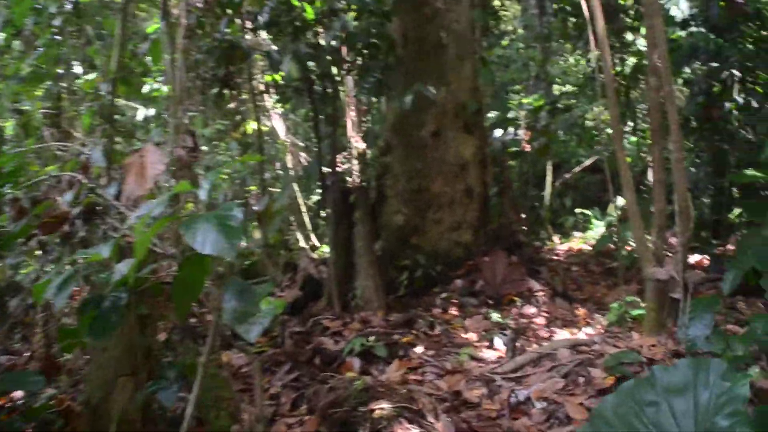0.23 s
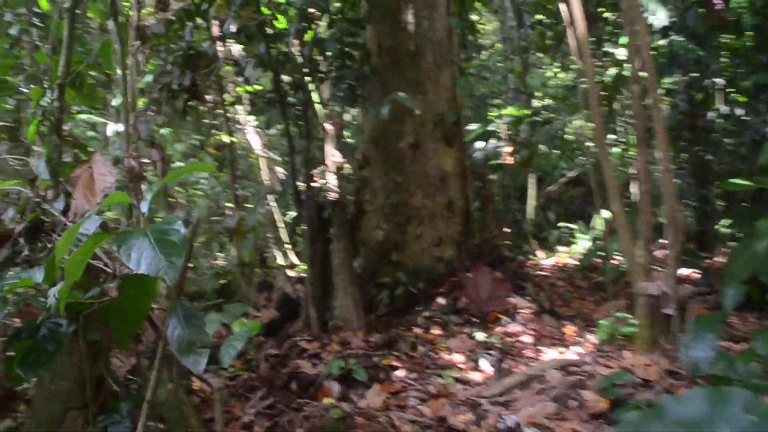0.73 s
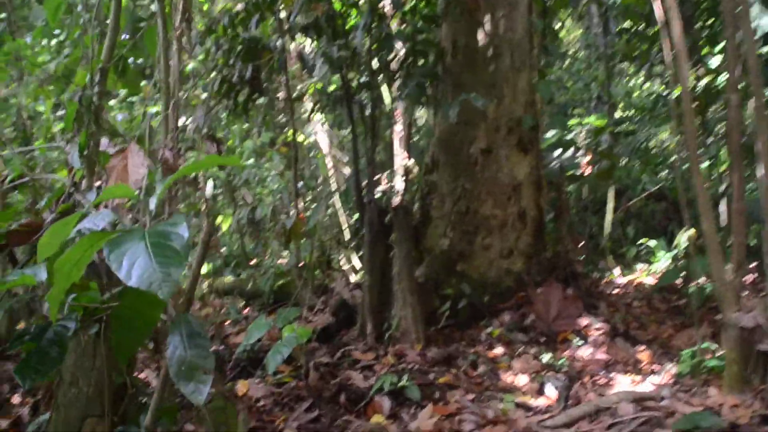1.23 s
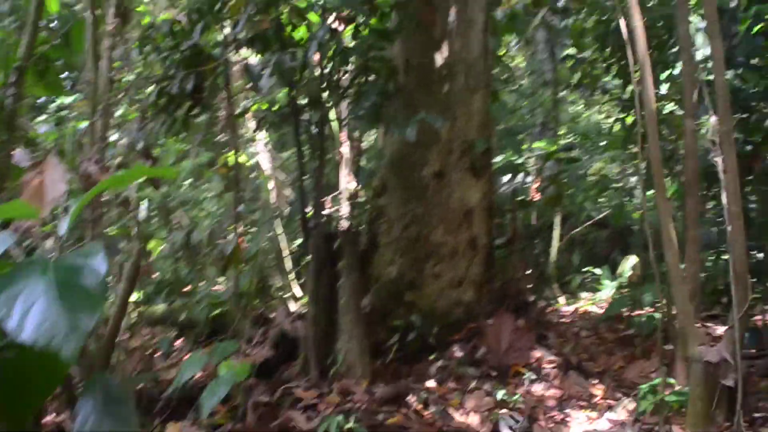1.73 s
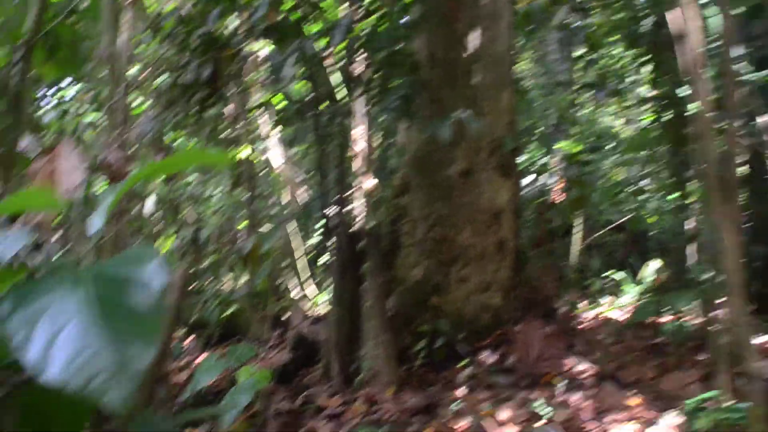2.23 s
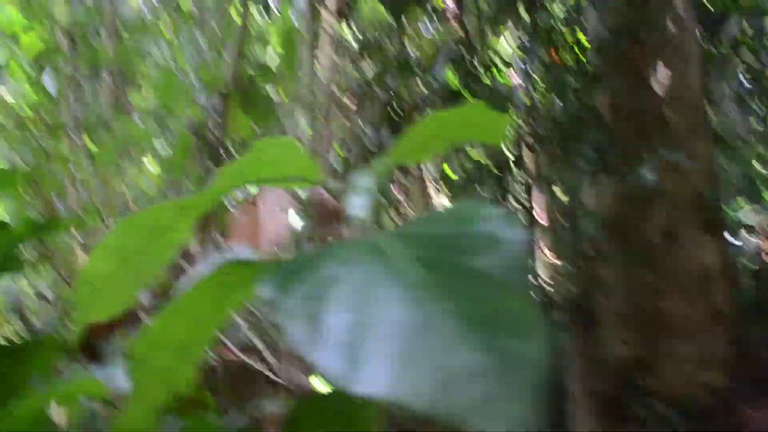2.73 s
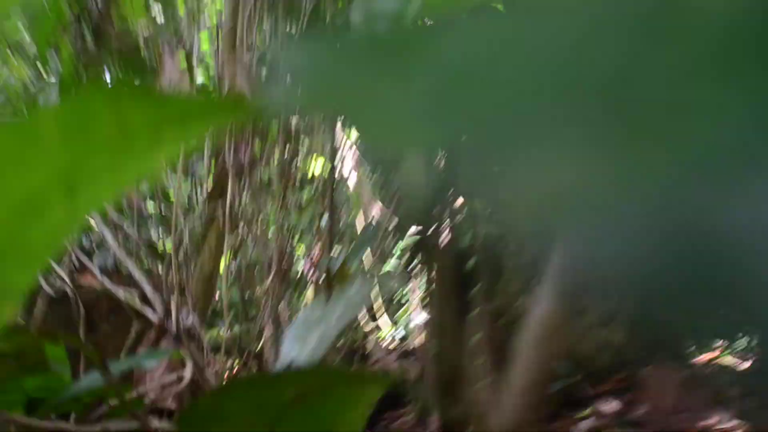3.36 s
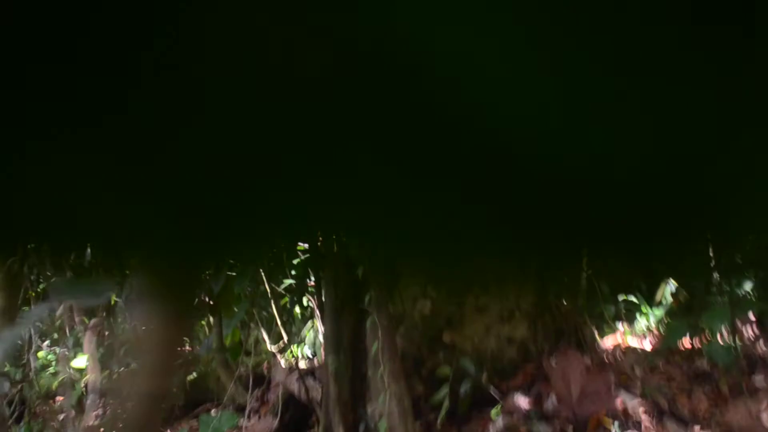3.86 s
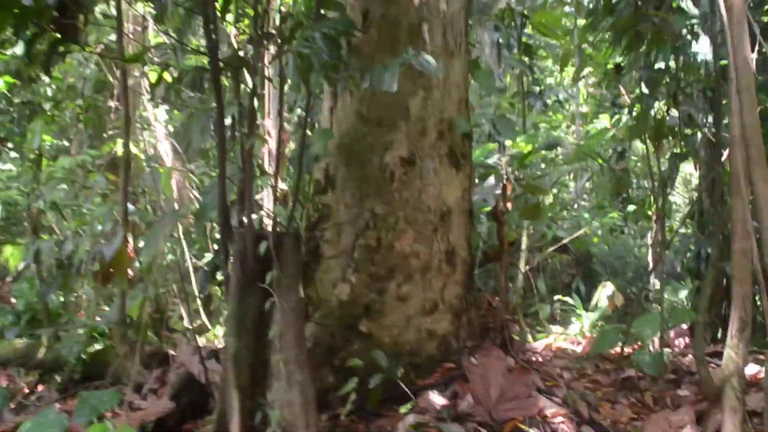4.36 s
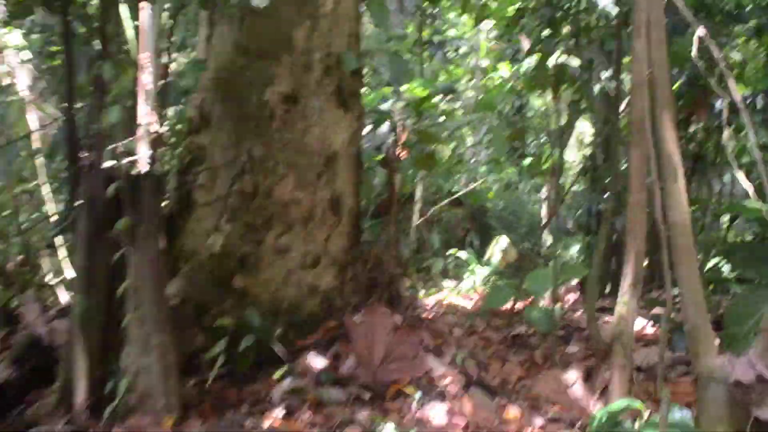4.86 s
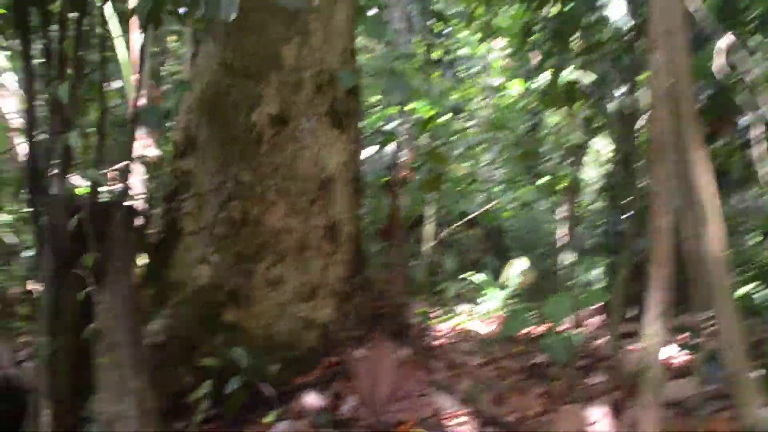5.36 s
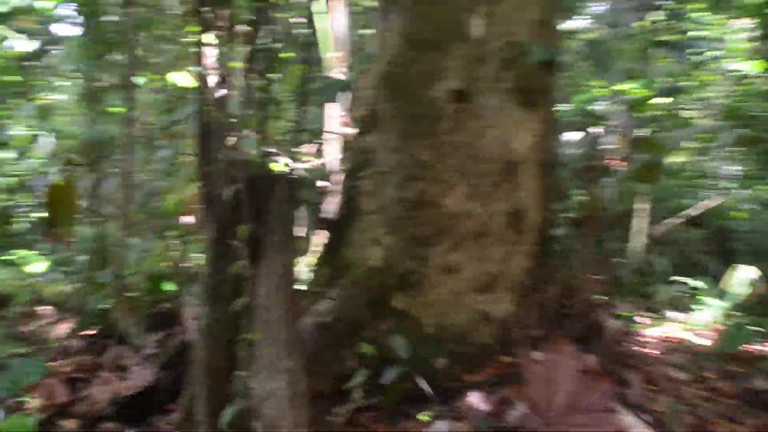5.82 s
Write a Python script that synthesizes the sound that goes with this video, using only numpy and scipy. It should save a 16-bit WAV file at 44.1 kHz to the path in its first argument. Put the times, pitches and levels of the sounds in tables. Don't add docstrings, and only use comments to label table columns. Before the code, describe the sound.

Quiet rainforest hiss with a distant hoot, then leaves and twigs knock the microphone as a shrill cicada buzz bursts in and quickens.

```python
import sys
import numpy as np
from scipy import signal
from scipy.fft import rfft, irfft, next_fast_len
from scipy.io import wavfile
from scipy.ndimage import map_coordinates

SR = 44100
rng = np.random.default_rng(int(sys.argv[2]) if len(sys.argv) > 2 else 0)


def materialize(psi):
    bounded = np.clip(np.atleast_2d(psi).T, -1, 1)
    quanta = np.round(bounded * 32767).astype(np.int16)
    wavfile.write(sys.argv[1], SR, quanta)


def makeup_ratio(level_db):
    decades = np.asarray(level_db, float) / 20
    return 10 ** decades


N = 268569


def rms_one(x):
    return x / np.sqrt(np.mean(x ** 2) + 1e-20)


def in_time(rows):
    s, *columns = np.transpose(rows)
    return [np.interp(np.arange(N) / SR, s, c) for c in columns]


def coloured(x, spectrum):
    size = next_fast_len(N)
    hz, db = np.transpose(spectrum)
    log_hz = np.log(np.maximum(np.arange(size // 2 + 1) * SR / size, 1))
    gain = makeup_ratio(np.interp(log_hz, np.log(hz), db, left=-90, right=-90))
    return rms_one(irfft(rfft(x, size) * gain, size)[:N])


def drift(rate_hz):
    r = np.exp(-2 * np.pi * rate_hz / SR)
    slow = signal.lfilter([1], [1, -2 * r, r * r], rng.standard_normal(N + SR))
    return rms_one(slow[SR:])


def resonance(x, hz, width_hz):
    r = np.exp(-np.pi * width_hz / SR)
    return signal.lfilter([(1 - r * r) / 2, 0, (r * r - 1) / 2], [1, -2 * r * np.cos(2 * np.pi * hz / SR), r * r], x)


def delayed(x, lag_ms):
    return map_coordinates(x, [np.arange(N) - lag_ms / 1000 * SR], order=3)


def band(x, low_hz, high_hz):
    return signal.sosfilt(signal.butter(2, [low_hz, high_hz], "band", fs=SR, output="sos"), x)


def grains(per_s, spread_db):
    sizes = makeup_ratio(spread_db * np.minimum(rng.exponential(1, N), 4)) * rng.choice([-1, 1], N)
    return sizes * (rng.random(N) < per_s / SR) + 0.17 * rng.standard_normal(N)


def swells(at_s, rise_s, fade_s, db, edge_db=20.0):
    t, out = np.arange(N) / SR, np.zeros(N)
    for s, rise, fade, peak_db in np.broadcast(at_s, rise_s, fade_s, db):
        near = slice(max(int((s - 4 * rise) * SR), 0), int((s + 4 * fade) * SR))
        distance = np.maximum((s - t[near]) / rise, (t[near] - s) / fade)
        out[near] += makeup_ratio(peak_db - edge_db * distance)
    return out


# t/s, level/dB, share of the two low modes/dB
CICADA_LEVEL = [(3.25, -34.5, 1), (3.33, -27, -10), (3.61, -18.5, -10), (3.89, -20, -4), (4.02, -20.5, -10),
                (4.06, -15, -9.5), (5.08, -15, -6), (5.52, -14.5, -4.5), (6.07, -16, -8.5)]
# t/s, clicks per s, lag of the inverted echo off the bark/ms
TYMBAL_RHYTHM = [(3.2, 284, 1.50), (3.55, 306, 1.356), (3.9, 305, 1.32), (4.3, 306, 1.316),
                 (4.6, 314, 1.316), (5.05, 331, 1.324), (5.5, 371, 1.352), (5.75, 394, 1.40),
                 (5.9, 410, 1.49), (6.09, 430, 1.515)]
# f/Hz, width/Hz, level/dB
ABDOMEN_MODES = [(2830, 550, -62), (3515, 574, 1.5), (4212, 923, 8.5), (4750, 680, -7), (5640, 1300, -14)]
# f/Hz, level per Hz/dB
SNAP_COLOUR = [(5000, -43), (5600, -4.5), (6500, -3.5), (7300, -4), (8200, -11.5), (10000, -14.5),
               (11500, -24.5), (13000, -34), (14500, -32), (15600, -59)]
# lag/ms, level/dB
TRUNK_ECHOES = [(4.7, -14.5), (7.9, -13.5), (13.3, -17.5), (21.7, -10.5), (34.1, -11)]


def cicada(strength_db=1.0, weak_db=0.0, rattle_ms=27.0, bark_hz=3600, bark_ms=0.02):
    rate, lag_ms = in_time(TYMBAL_RHYTHM)
    level_db, low_db = in_time(CICADA_LEVEL)
    faster = rate - 305
    uneven = np.clip(0.025 + 0.002 * (rate - 370), 0.025, 0.11)
    jitter_ms = 0.09 - 0.0003 * faster
    echo = 0.5 * np.exp(-np.maximum(lag_ms - 1.32, 0) / 0.1)

    beat = np.cumsum(rate) / SR
    k = np.arange(1, int(beat[-1]))
    at = np.interp(k, beat, np.arange(N)).astype(int)
    odd = k % 2
    time_luck, strength_luck = rng.standard_normal((2, len(k)))
    late_s = -odd * uneven[at] * 2 / rate[at] + jitter_ms[at] / 1000 * time_luck
    clicks = np.full(N, 1e-18)
    clicks[np.clip(at + late_s * SR, 0, N - 1).astype(int)] = makeup_ratio(strength_db * strength_luck + weak_db * odd)
    scatter = makeup_ratio(-10.5) * rng.standard_normal(N)
    drive = rms_one(clicks) + scatter

    top_db = 1.9 * (-3 + 0.08 * faster)
    ring = np.zeros(N)
    for hz, width_hz, db in ABDOMEN_MODES:
        mode_db = db + (hz < 3800) * (low_db + 7.0) + (hz > 4450) * top_db
        ring += makeup_ratio(mode_db) * resonance(resonance(drive, hz, width_hz), hz, width_hz)
    ring = rms_one(signal.sosfilt(signal.butter(8, 2650, "high", fs=SR, output="sos"), ring))

    r = np.exp(-1000 / (rattle_ms * SR))
    rattle = rms_one(signal.lfilter([1], [1, -r], clicks)) * rng.standard_normal(N)
    snap_db = -10.5 - 0.0747 * faster - 0.5
    snap = makeup_ratio(snap_db) * coloured(rattle + scatter, SNAP_COLOUR)

    low_return = delayed(0.32 * ring + 0.23 * resonance(ring, bark_hz, 880), lag_ms + bark_ms)
    song = ring - echo * low_return + snap - 0.68 * delayed(snap, lag_ms)
    song = song + sum(makeup_ratio(db) * delayed(song, ms + 0.05 * drift(0.7)) for ms, db in TRUNK_ECHOES)
    started = np.arange(N) > CICADA_LEVEL[0][0] * SR
    return makeup_ratio(level_db + 0.46) * song * started


# middle t/s, length/s, housing level/dB, brightness/dB
LEAF_SWEEPS = [(2.498, .3, -34, -4), (2.685, 0.26, -35.5, 5.5), (3.02, 0.99, -43, 4),
               (3.302, .36, -29.5, 4), (3.81, .6, -35, 7.5), (3.933, 0.15, -36, 8.5), (4.447, 1, -45, 8),
               (4.795, 0.51, -38.5, -5), (5.282, 0.46, -42, 6)]
# t/s, fade/s, housing level/dB, brightness/dB
LEAF_SCUFFS = [(2.731, 0.069, -26, 5), (2.89, .04, -32.5, -6), (3.238, 0.013, -25.5, -1),
               (3.976, 0.026, -24.5, 11), (4.009, 0.071, -18, -2), (4.032, 0.01, -21, 13),
               (4.088, 0.048, -30, -7), (4.122, 0.016, -28, 1), (4.964, 0.081, -57, 20),
               (5.132, 0.024, -34, -5), (5.182, 0.05, -36, -5), (5.345, 0.035, -32, 0),
               (5.499, 0.055, -36.5, 7)]
# t/s, fade/s, level/dB
DRY_EDGES = [(2.446, 0.047, -49), (2.514, 0.05, -39.5), (2.69, .03, -49), (2.705, 0.045, -22.5),
             (2.74, 0.13, -33), (2.82, 0.037, -44), (3.037, 0.019, -34), (3.2, 0.12, -39),
             (3.236, 0.026, -23.5), (3.26, .11, -48)]


def brushing(scuff_rise_s=0.005):
    s, length, db, bright_db = np.transpose([*LEAF_SWEEPS, *LEAF_SCUFFS])
    slow = np.arange(len(s)) < len(LEAF_SWEEPS)
    rise = np.where(slow, length / 2, scuff_rise_s)
    fade = np.where(slow, length / 2, length)
    scrape = grains(2500.0, spread_db=2.5) * makeup_ratio(2.5 * drift(30.0))
    low = rms_one(band(scrape, 312, 1170)) * swells(s, rise, fade, db - 1.0)
    mid = rms_one(band(scrape, 700, 4000)) * swells(s, rise, fade, db + bright_db - 2.5)
    edge_s, edge_fade, edge_db = np.transpose(DRY_EDGES)
    hiss = rms_one(band(band(scrape, 1200, 9000), 860, 9200))
    return low + mid + hiss * swells(edge_s, scuff_rise_s, edge_fade, edge_db + 1.0)


# t/s, peak level/dB, ring f/Hz, crack level/dB
HOUSING_BUMPS = [(2.449, -27.5, 626, -27), (2.485, -24, 600, -31), (2.519, -24.5, 460, -29),
                 (2.884, -27, 600, -35), (3.184, -27, 620, -32), (3.239, -29, 610, -20),
                 (3.274, -29, 1090, -14), (3.324, -29, 754, -25), (3.961, -24, 626, -20),
                 (4.095, -28, 662, -9), (5.498, -28, 523, -11), (5.889, -24, 1030, -9)]
# t/s, peak level/dB, ring f/Hz, crack level/dB
TWIG_RAPS = [(2.425, -23, 2300, -24), (2.704, -21, 2130, -20), (2.731, -2, 2080, -34),
             (2.769, -26, 1650, -24), (2.818, -30, 2220, -13), (3.129, -31, 1350, -16),
             (3.232, -14, 2070, -18), (3.396, -20, 1630, -15), (3.828, -27, 2370, -8),
             (4.521, -21.5, 2310, -17), (4.748, -21.5, 2240, -15)]
# t/s, peak level/dB, ring f/Hz, crack level/dB
STEM_TICKS = [(2.5162, -21.5, 2650, -30), (3.033, -23, 4030, -36), (3.0973, -16, 3160, -36),
              (3.9739, -8, 2520, -21), (3.9744, -15, 4270, -36), (4.0073, -12, 2670, -30),
              (4.0147, -5.5, 1890, -28), (4.0196, -3.5, 2640, -32), (4.0296, 10.5, 3450, -37),
              (4.029, -8, 2180, -28), (4.121, -5.5, 1830, -17), (5.3471, -3.5, 1760, -15.5),
              (5.3467, -11, 2800, -30), (5.9734, -3.5, 2100, -30)]
# t/s, peak level/dB, ring f/Hz, crack level/dB
CAPSULE_JOLTS = [
    (3.974, -16, 625, -14),
    (4.008, -9, 654, -15),
    (4.018, -13.5, 1020, -9),
    (4.0297, -7.5, 810, -9),
    (4.086, -20, 503, -22),
]
# time to fade 60 dB/s, thud level/dB, jolt level/dB
KINDS_OF_BLOW = [
    (0.034, -5, -19),
    (0.039, -8, -23),
    (0.02, -32, -41),
    (0.024, -2.5, 0.5),
]


def knocks():
    out, t = np.zeros(N + SR), np.arange(SR // 5) / SR
    groups = [HOUSING_BUMPS, TWIG_RAPS, STEM_TICKS, CAPSULE_JOLTS]
    blows = np.array([[*row, *kind] for rows, kind in zip(groups, KINDS_OF_BLOW) for row in rows])
    white = rng.standard_normal((len(blows), len(t)))
    white[:, 0] += 0.64 * np.clip(blows[:, 1] + 31.0, 0, None)
    for (s, db, hz, crack_db, t60, thud_db, jolt_db), noise in zip(blows, white):
        blow = noise * makeup_ratio(-60 * t / max(t60, 0.004))
        ring = band(band(blow, 0.56 * hz, 1.12 * hz), 0.86 * hz, 1.55 * hz)
        rattle = band(blow, 620, 2900)
        thud = band(resonance(blow, 282, 180) + 0.5 * resonance(blow, 1056, 140), 247, 1520)
        jolt = band(blow, 72, 410)
        crack = band(band(blow, 1770, 7700), 1800, 17500)
        layers = [(ring, -1.5), (rattle, -14.0), (thud, thud_db), (jolt, jolt_db), (crack, crack_db + 18.0)]
        start = round(s * SR)
        out[start:start + len(t)] += makeup_ratio(db) * sum(makeup_ratio(g) * x / np.abs(x).max() for x, g in layers)
    return out[:N]


# t/s, fade/s, level/dB
AIR_PUFFS = [(.792, 0.065, -39), (.865, 0.1, -45), (1.52, .2, -60), (3.816, .06, -46), (3.96, .08, -44),
             (4.04, 0.077, -29.5), (4.088, 0.068, -38), (4.24, 0.11, -58)]


def buffet():
    air = rms_one(band(band(rng.standard_normal(N), 48, 200), 42, 280))
    s, fade, db = np.transpose(AIR_PUFFS)
    return air * swells(s, fade, fade, db)


def whistle(notes, octave_db):
    s, length, hz, db = np.transpose(notes)
    pitch_hz = np.interp(np.arange(N) / SR, s, hz) * (1 + 0.0079 * drift(23.0))
    phase = 2 * np.pi * np.cumsum(pitch_hz) / SR
    level = swells(s, length / 2, length / 2, db, edge_db=10) * makeup_ratio(2.5 * drift(20.0))
    return np.sqrt(2) * level * (np.sin(phase) + makeup_ratio(octave_db) * np.sin(2 * phase))


# middle t/s, length/s, pitch f/Hz, level/dB
HOOT_NOTES = [
    (1.06, 0.15, 886, -51),
    (1.2, .15, 949, -43.5),
    (1.36, 0.13, 942, -45.5),
]


def hoot():
    return whistle(HOOT_NOTES, octave_db=-9.0)


# middle t/s, length/s, pitch f/Hz, level/dB
CHIRP_NOTES = [
    (5.70, .06, 1655, -51),
    (5.757, .05, 1695, -50),
]


def bird():
    return whistle(CHIRP_NOTES, octave_db=-30.0)


# t/s, high band level/dB
CHORUS_FADE = [(0.0, -40), (0.3, -40), (0.68, -45.5), (2.4, -48), (3.2, -51)]
# f/Hz, level per Hz/dB
LOW_INSECTS = [(1710, -52), (2900, -16.5), (3170, -34.5), (3360, -9.5), (3650, -4.5), (4210, -6.5),
               (4660, -3), (5280, -9), (5700, -9), (7410, -36), (12500, -120)]
HIGH_INSECTS = [(3240, -12.5), (5500, -1), (5740, -9), (6570, 0), (8200, -6.5), (10400, -11), (13600, -31),
                (14800, -37), (15500, -52)]


def chorus():
    high_db, = in_time(CHORUS_FADE)
    low_db = -38 + 0.55 * (high_db - high_db[0])
    low = coloured(grains(5000.0, spread_db=-4.5), LOW_INSECTS) * makeup_ratio(low_db + 0.72 * drift(0.97))
    high = coloured(grains(5000.0, spread_db=-3.0), HIGH_INSECTS)
    high = high + 0.11 * np.roll(high, int(0.001108 * SR))
    return low + high * makeup_ratio(high_db + 0.16 * drift(11.0))


# f/Hz, level per Hz/dB
FOREST_COLOUR = [(15, -43), (25, -18.5), (113, -10), (151, -3), (198, -9), (345, -5), (533, -4),
                 (683, -2.5), (790, -3.5), (1270, -3.5), (2180, -5.5), (2620, -8), (3500, -8), (4550, -39),
                 (7700, -120)]


def forest(level_db=-40.5, duck_from_s=4.7, duck_db_per_s=3):
    duck_db = duck_db_per_s * np.maximum(np.arange(N) / SR - duck_from_s, 0)
    return coloured(rng.standard_normal(N), FOREST_COLOUR) * makeup_ratio(level_db - duck_db + 0.5 * drift(4.0))


def scene():
    calls = hoot() + bird()
    mono = cicada() + chorus() + forest() + calls + brushing() + buffet() + knocks()
    return np.array([mono, mono])


def band_limit(x):
    return signal.sosfilt(signal.butter(12, 15670, fs=SR, output="sos"), x)


# f/Hz, width/Hz, depth/dB
HOUSING_GAPS = [(5700, 600, 16), (6900, 220, 16)]


def record(dry):
    for hz, width_hz, depth_db in HOUSING_GAPS:
        dry = dry - (1 - makeup_ratio(-depth_db)) * resonance(dry, hz, width_hz)
    dry = signal.sosfilt(signal.butter(4, 14500, fs=SR, output="sos"), dry)
    mix = np.clip(dry, -1, 1)
    return band_limit(mix)


dry = scene()
out = record(dry)
materialize(out)
```